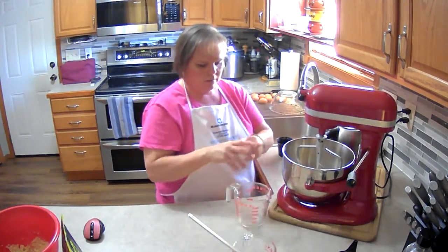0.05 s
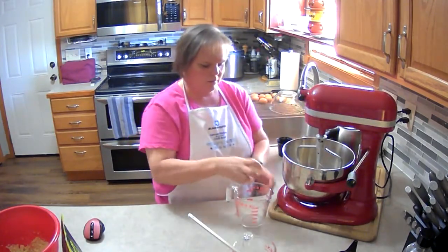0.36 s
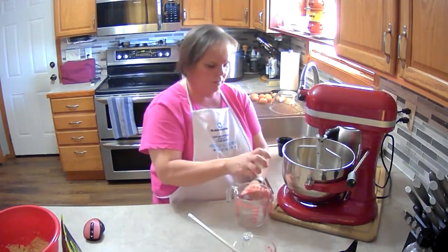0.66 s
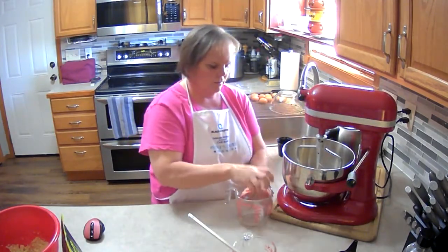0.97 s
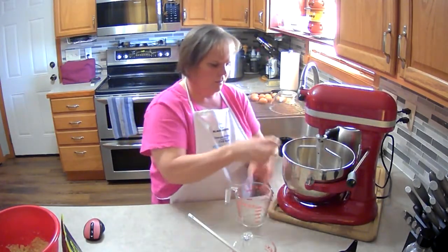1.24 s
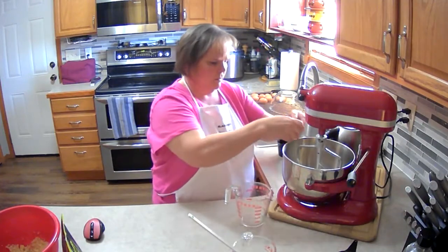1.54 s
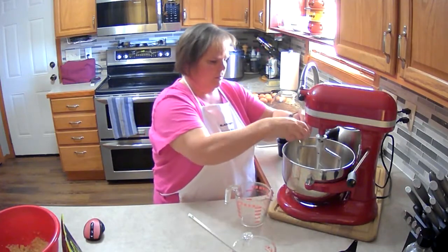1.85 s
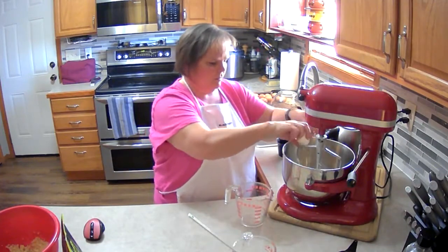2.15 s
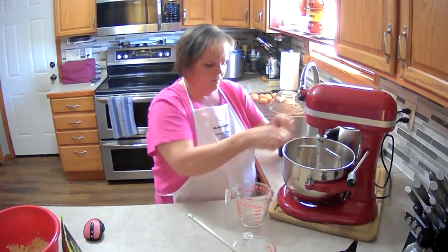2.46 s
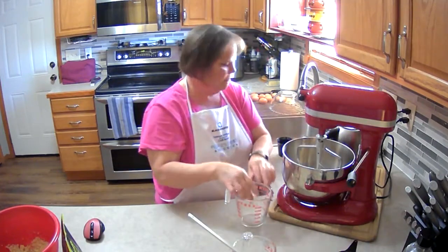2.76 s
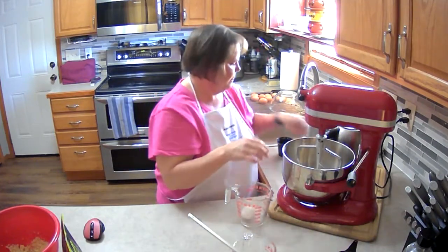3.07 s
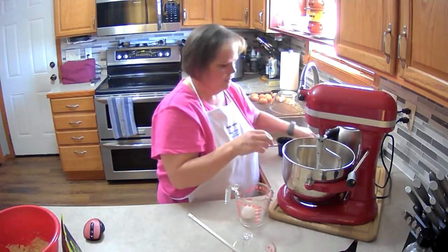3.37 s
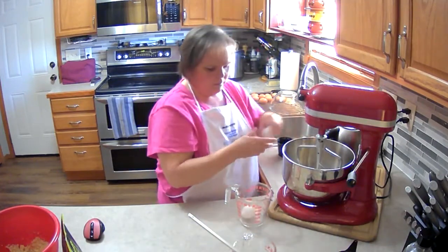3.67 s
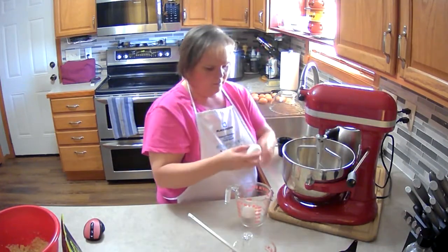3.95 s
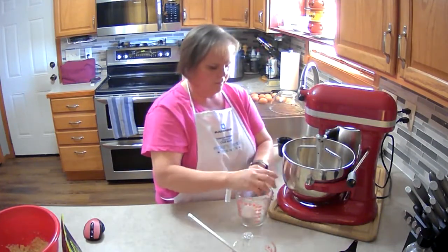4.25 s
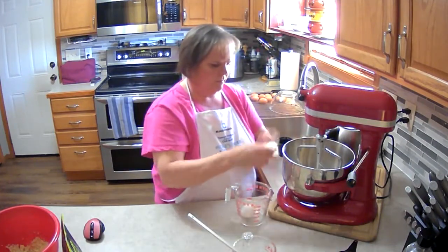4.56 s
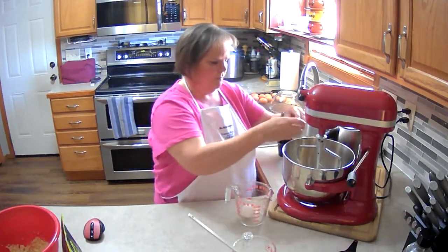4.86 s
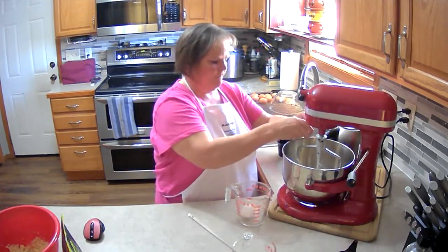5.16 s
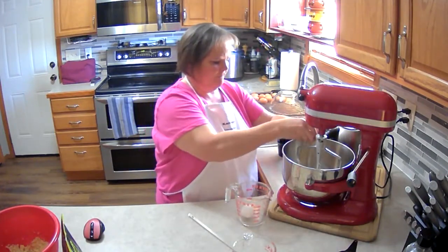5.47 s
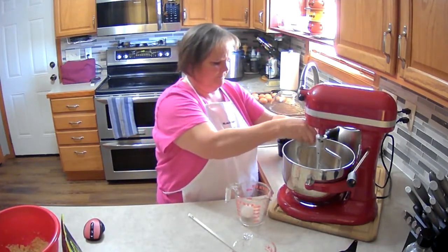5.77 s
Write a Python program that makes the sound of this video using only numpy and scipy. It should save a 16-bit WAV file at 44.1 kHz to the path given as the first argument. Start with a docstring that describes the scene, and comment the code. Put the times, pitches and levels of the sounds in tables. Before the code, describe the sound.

In a humming kitchen, eggshells crunch against a glass rim, the counter knocks, and shells click as they are pulled apart.

```python
"""A kitchen counter, where two eggs are cracked on the rim of a glass measuring cup.
Each blow crunches the shell, makes the glass clink and knocks on the counter. The shells snap as they
are pulled apart over a steel bowl, and egg plops in. An empty half shell drops into the cup and rocks;
the next egg bumps about as it is picked up. An appliance hums in the echoing room.
The microphone misses the highest treble, hisses, and overloads on the hard blows."""
import sys
import numpy as np
from scipy import signal
from scipy.fft import rfft, irfft, next_fast_len
from scipy.io import wavfile

SR = 44100
rng = np.random.default_rng(int(sys.argv[2]) if len(sys.argv) > 2 else 0)


def generate_wav(sig):
    """Save sig (samples, or channels by samples) to the path in sys.argv[1] as 16-bit PCM at SR."""
    pcm = np.round(np.clip(np.atleast_2d(sig).T, -1, 1) * 32767).astype(np.int16)
    wavfile.write(sys.argv[1], SR, pcm)


N = 265261
T = np.arange(int(.6 * SR)) / SR  # the seconds that pass during one short sound


def amp(db):
    """Turn decibels into a number to multiply a sound by."""
    return 10 ** (np.asarray(db) / 20)


def along(points, hz):
    """Read between the rows of a (pitch, value) table, giving each octave equal room."""
    pitches, values = np.transpose(points)
    return np.interp(np.log(hz + 1), np.log(pitches + 1), values)


def filtered(x, response):
    """Turn each frequency in x up or down by response(hz)."""
    size = next_fast_len(len(x) + SR // 4)
    return irfft(rfft(x, size) * response(np.fft.rfftfreq(size, 1 / SR)), size)[:len(x)]


def fade(t, fade_s):
    """Die away by 60 dB every fade_s seconds."""
    return np.exp(-np.log(1000) * t / fade_s)


def blow(x, db):
    """Give a hit as much energy as 10 ms of steady sound at this level."""
    return amp(db) * x / np.sqrt(np.sum(x ** 2) / (SR / 100))


def burst(tone, fade_s):
    """Many tiny contacts make a quickly dying noise with no pitch of its own."""
    spray = rfft(rng.standard_normal(len(T)) * fade(T, fade_s))
    colour = amp(along(tone, np.fft.rfftfreq(len(T), 1 / SR)))
    return irfft(colour * spray / np.abs(spray), len(T)) * fade(T, 2 * fade_s)


def ring(notes, scatter_db):
    """A struck object rings with several notes, their strengths a little different each time."""
    return sum(amp(db + scatter_db * rng.standard_normal()) * fade(T, fade_s) * np.sin(2 * np.pi * hz * T)
               for hz, db, fade_s in notes)


def body(notes, scale=1):
    """A tapped object's short notes: wider ones die sooner. Scale multiplies pitches and widths."""
    return sum((-1) ** k * amp(db) * width * np.exp(-np.pi * width * scale * T)
               * np.sin(2 * np.pi * hz * scale * T) for k, (hz, width, db) in enumerate(notes))


def add(track, start_s, x):
    """Mix x into the track at start_s."""
    start = max(0, round(start_s * SR))
    track[start:start + len(x)] += x[:max(0, N - start)]


# How long the room echoes: pitch_hz, fade_s
ROOM_ECHO = [(100, 0.4), (400, 0.37), (1200, 0.42), (3000, 0.43), (7000, 0.28)]
def kitchen(x, echo_db, build_s=0.0013):
    """A sound plus its many echoes off cupboards and walls."""
    hz, t, noise = signal.stft(rng.standard_normal(len(T)), SR, nperseg=256)
    fading = noise * fade(t, along(ROOM_ECHO, hz)[:, None])
    tail = signal.istft(fading, SR, nperseg=256)[1][:len(T)]
    tail = tail * (1 - np.exp(-T / build_s))
    return x + amp(echo_db) * signal.fftconvolve(x, tail / np.linalg.norm(tail))[:len(T)]


# The motor's notes: pitch_hz, level_db
MOTOR_NOTES = [(59.2, -41.5), (118.4, -55.5), (177.6, -53), (296, -61.5), (4371, -65)]
# The tone of the room noise and hiss: pitch_hz, level_db
HISS_TONE = [(12, -8.5), (24, 6), (60, -2), (87, -8), (130, -8), (220, -10), (310, -10), (450, -13.5),
             (1110, -18), (1700, -20), (4400, -22.5), (7000, -23)]
def hum_and_hiss(hiss_db=-37.0):
    """An appliance motor hums over steady room noise and hiss."""
    t = np.arange(N) / SR
    hum = sum(np.sqrt(2) * amp(db) * np.sin(2 * np.pi * (hz * t + rng.random()))
              for hz, db in MOTOR_NOTES)
    hiss = filtered(rng.standard_normal(N), lambda hz: amp(along(HISS_TONE, hz)) * (hz < 1.1 * MIC_HZ))
    return hum + amp(hiss_db) * hiss / np.std(hiss)


# The counter's short notes: pitch_hz, width_hz, level_db
COUNTER_NOTES = [(59, 6, 8), (110, 25, 9.5), (334.4, 45.5, 8), (430.6, 28.4, 2.5), (588, 42, -10.5),
                 (698.4, 31, 2.5), (820, 150, -1.5), (1264, 320, -3), (1800, 410, -2)]
# The tone of the noise between those notes: pitch_hz, level_db
THUD_TONE = [(40, -6.5), (100, -20.5), (200, 9.5), (400, 9.5), (1200, 6), (2200, 2), (4000, -4.5),
             (7000, -19.5)]
# The deep notes of the cupboard underneath: pitch_hz, width_hz, level_db
CUPBOARD_NOTES = [(54.5, 17, -5), (108.3, 20, 1), (138, 29.7, 0), (211.4, 55, -7)]
def knock(db, contact_hz, length_s, boom_db):
    """The counter thuds and the cupboard booms; a soft contact is lower, and a long one swells in."""
    thud = blow(body(COUNTER_NOTES), 0) + blow(burst(THUD_TONE, length_s), 2)
    thud = thud * (1 - np.exp(-T / (0.055 * length_s)))
    # favour the pitches near contact_hz
    thud = filtered(thud, lambda hz: 1j * hz / (contact_hz ** 2 - hz ** 2 + 1j * hz * contact_hz))
    return blow(thud, db) + blow(body(CUPBOARD_NOTES), boom_db)


# Dull blows on the counter: start_s, level_db, contact_hz, length_s
COUNTER_BUMPS = [(0.0, -22.5, 310, 0.049), (1.0485, 3.5, 622, .052), (3.4112, -14.5, 483, .08),
                 (3.454, -17.5, 320, .07), (3.646, -23, 330, 0.072), (4.448, -15.5, 350, .037),
                 (4.4608, -8, 494, .041)]
def counter_knocks(bounce_db=-8):
    """Hands, eggs and the cup's foot bump the counter and land again, softer and duller."""
    out = np.zeros(N)
    for start_s, db, contact_hz, length_s in COUNTER_BUMPS:
        boom_db = -12.5 + 0.9 * db  # a harder thud booms more
        add(out, start_s, kitchen(knock(db, contact_hz, length_s, boom_db), echo_db=-1.5))
        bounce = knock(db + bounce_db, contact_hz * 0.9, length_s, boom_db + bounce_db)
        add(out, start_s + .22 * length_s, kitchen(bounce, echo_db=-2.5))
    return out


# The cup's notes, struck at two spots on its rim: pitch_hz, spot_0_db, spot_1_db, fade_s
CUP_NOTES = [(1670, -7, -7, .22), (3176, 1, -1, .18), (3596, -8, -5, .2), (4317, -22, -2, .15),
             (5018, -2, 1, .24), (5728, -18, -2, .09), (6222, -1, -3, .11)]
# The tone of shell giving way: pitch_hz, level_db
CRACK_TONE = [(100, -22.5), (800, 4.5), (1400, 3.5), (2500, -1), (3300, 3.5), (4000, 1.5), (5500, 3),
              (7000, 2)]
# An egg hits the rim: start_s, ring_db, fade_share, spot (0 to 1), crack_db, knock_db
RIM_HITS = [(0.9725, -3, 0.79, 0, -3, -10), (1.0508, -16, 0.65, .2, -10.5, -14),
            (4.3416, -7, 0.45, 0.78, -5.5, -10)]
def egg_on_rim():
    """The shell cracks, the glass rings until the hand stills it, and the blow reaches the counter."""
    out = np.zeros(N)
    for start_s, ring_db, fade_share, spot, crack_db, knock_db in RIM_HITS:
        # where the egg lands decides which notes ring loudest
        notes = [(hz, np.interp(spot, [0, 1], levels), fade_s * fade_share)
                 for hz, *levels, fade_s in CUP_NOTES]
        glass = kitchen(blow(ring(notes, scatter_db=3.5), ring_db), echo_db=-6)
        crack = blow(burst(CRACK_TONE, fade_s=0.11), crack_db)
        thud = knock(knock_db, contact_hz=525, length_s=0.062, boom_db=knock_db - 6)
        add(out, start_s, glass + kitchen(crack + thud, echo_db=-1))
    return out


# The tone of snapping shell: pitch_hz, level_db
SNAP_TONE = [(200, -12), (1100, -45), (2200, -10), (3100, -3), (3600, -4), (4800, -0.5), (5800, 2.5),
             (7000, -6.5)]
# A stiff flake's notes, as multiples of ping_hz: pitch_ratio, width_ratio, level_db
FLAKE_NOTES = [(1, 0.029, -4), (1.06, 0.006, -1.5)]
def snap(db, ping_db, ping_hz):
    """Brittle shell snaps and a flake pings; a harder blow sets off a longer run of tiny breaks."""
    breaks = blow(burst(SNAP_TONE, fade_s=0.076 * amp(db) ** 0.17), db)
    ping = blow(body(FLAKE_NOTES, ping_hz), ping_db)
    return kitchen(breaks, echo_db=-2) + kitchen(ping, echo_db=-12)


# The shell breaks as it is opened: start_s, level_db, ping_hz
PULL_SNAPS = [(1.4131, -36.5, 5060), (1.8938, -30.5, 4360), (2.0597, -42.5, 3600), (2.2389, -38.5, 6400),
              (2.3164, -44, 6070), (5.142, -41, 4920)]
def pulled_shells(ping_db=-2.5, second_s=.0143, second_db=-7):
    """Thumbs pull the shell apart; each break runs on into a second, softer and lower snap."""
    out = np.zeros(N)
    for start_s, db, ping_hz in PULL_SNAPS:
        add(out, start_s, snap(db, db + ping_db, ping_hz))
        add(out, start_s + second_s, snap(db + second_db, db + second_db + ping_db, ping_hz * .82))
    return out


# The steel bowl's notes: pitch_hz, level_db, fade_s
BOWL_NOTES = [(1102, 7, 0.074), (1290, 7, 0.088), (1350, -7, 0.3)]
# Egg lands in the bowl: start_s, level_db
EGG_PLOPS = [(2.005, -45), (2.063, -35), (2.098, -44)]
def plops():
    """Yolk and white fall softly and make the steel bowl ring."""
    out = np.zeros(N)
    for start_s, db in EGG_PLOPS:
        steel = ring(BOWL_NOTES, scatter_db=2)
        add(out, start_s, kitchen(blow(steel, db), echo_db=-4))
    return out


# The shell's hollow notes, as multiples of hollow_hz: pitch_ratio, width_ratio, level_db
HOLLOW_NOTES = [(1, 0.063, -1), (1.13, 0.063, -5.5), (1.85, .2, -9)]
def hollow_ring(hollow_db, hollow_hz, tap_db):
    """A shell rings hollow, with a soft, dull tap underneath."""
    hollow = blow(body(HOLLOW_NOTES, hollow_hz), hollow_db)
    tap = knock(tap_db, contact_hz=486, length_s=0.044, boom_db=tap_db - 10)
    return kitchen(hollow, echo_db=-2) + kitchen(tap, echo_db=-4)


EDGE_HZ = 4835  # the ping of a shell's broken edge
# Shell cracks or taps with a hollow ring: start_s, snap_db, ping_db, hollow_db, hollow_hz
HOLLOW_CLICKS = [(2.7587, -54, -56, -42, 1675), (2.829, -23.5, -23.5, -34, 1690),
                 (2.8372, -28, -24, -26.5, 1620), (3.1645, -27.5, -38.5, -23.5, 1584),
                 (4.4629, -26.5, -35, -30.5, 1450), (5.1246, -31, -51, -40, 1280)]
def shell_cracks_and_taps():
    """A shell cracks or taps: a click plus the shell's hollow note."""
    out = np.zeros(N)
    for start_s, snap_db, ping_db, hollow_db, hollow_hz in HOLLOW_CLICKS:
        click = snap(snap_db, ping_db, EDGE_HZ)
        add(out, start_s, click + hollow_ring(hollow_db, hollow_hz, tap_db=hollow_db - 12))
    return out


def dropped_shell(start_s=2.9013, first_db=-5, first_swing_s=.0164, swing_loss_db=3.5):
    """A half shell falls into the cup and rocks from edge to edge, slower and softer each swing."""
    out = np.zeros(N)
    for k in range(4):
        swing_s = first_swing_s * 1.17 ** k
        for delay_s, edge_db in [(0, 0), (.35 * swing_s, -4)]:  # near edge, then far edge
            db = first_db - swing_loss_db * k + edge_db
            body_db = db - 5 * k  # the ring and tap fade faster than the clicks
            ping_hz = EDGE_HZ * np.exp(0.102 * rng.standard_normal())
            click = snap(db, db - 4, ping_hz)
            hollow = hollow_ring(body_db - 8, hollow_hz=1750, tap_db=body_db - 12.5)
            add(out, start_s + delay_s, click + hollow)
        start_s += swing_s
    return out


def rolling_egg(start_s=3.289, end_s=3.405, gap_s=0.019, level_db=-28.5):
    """An egg wobbles across the counter in a run of soft, uneven bumps."""
    out = np.zeros(N)
    for bump_s in np.arange(start_s, end_s, gap_s):
        db = level_db + 2.2 * rng.standard_normal()
        bump = knock(db, contact_hz=320, length_s=0.15, boom_db=db - 6)
        add(out, bump_s + 0.00307 * rng.standard_normal(), kitchen(bump, echo_db=-5))
    return out


def scene():
    """All the sounds meet at one microphone."""
    shells = pulled_shells() + shell_cracks_and_taps() + dropped_shell()
    return (egg_on_rim() + counter_knocks() + rolling_egg() + shells + plops() + hum_and_hiss())[None]


MIC_HZ, TOP_HZ = 6740, 16000  # where the treble is cut before and after the overload
def record(dry):
    """The microphone loses the high treble, and overloading flattens the loudest peaks."""
    narrow = filtered(dry[0], lambda hz: 1 / np.sqrt(1 + (hz / MIC_HZ) ** 110))
    clipped = narrow / (1 + np.abs(narrow) ** 14) ** (1 / 14)
    return filtered(clipped, lambda hz: 1 / np.sqrt(1 + (hz / TOP_HZ) ** 70))[None]


dry = scene()
out = record(dry)
generate_wav(out)
```